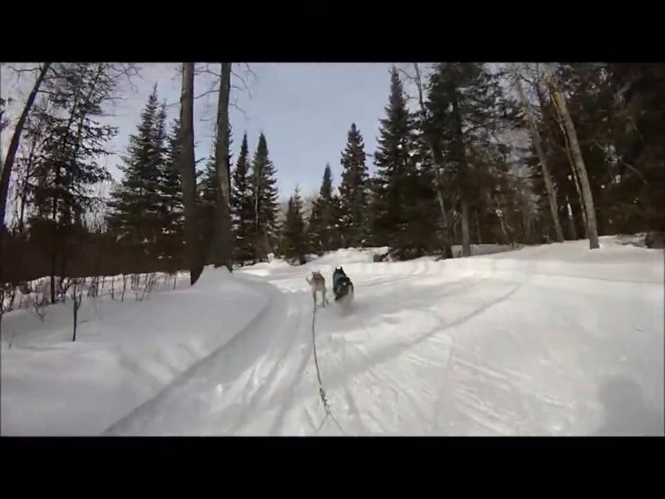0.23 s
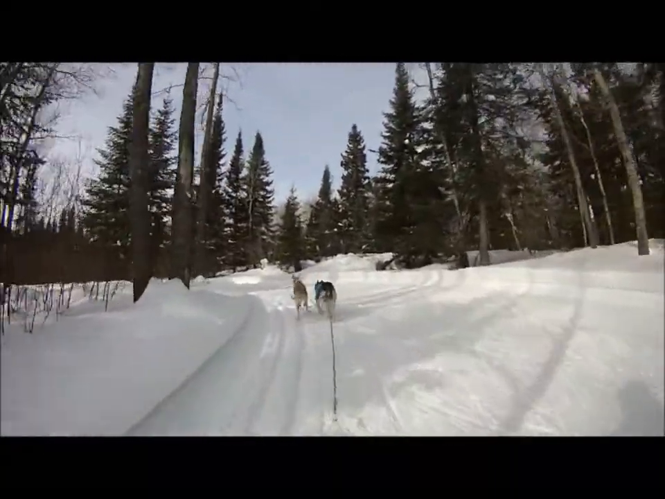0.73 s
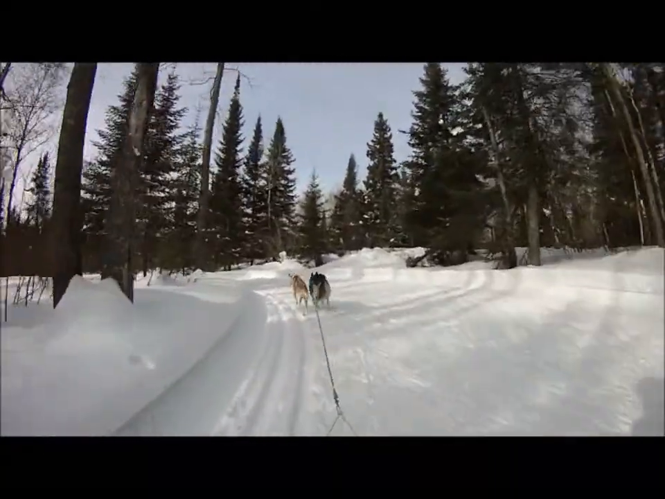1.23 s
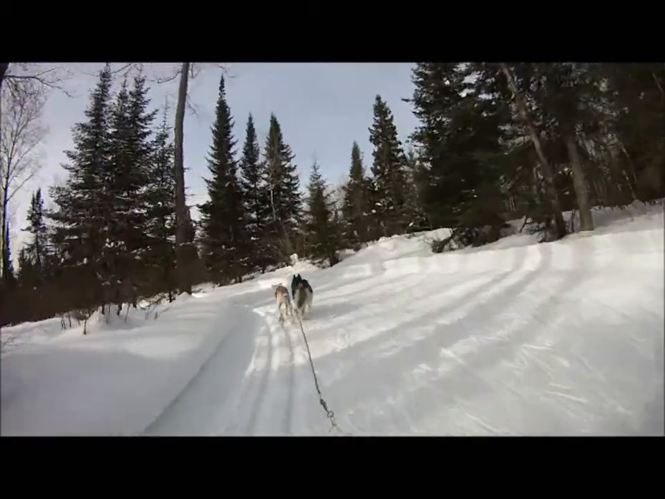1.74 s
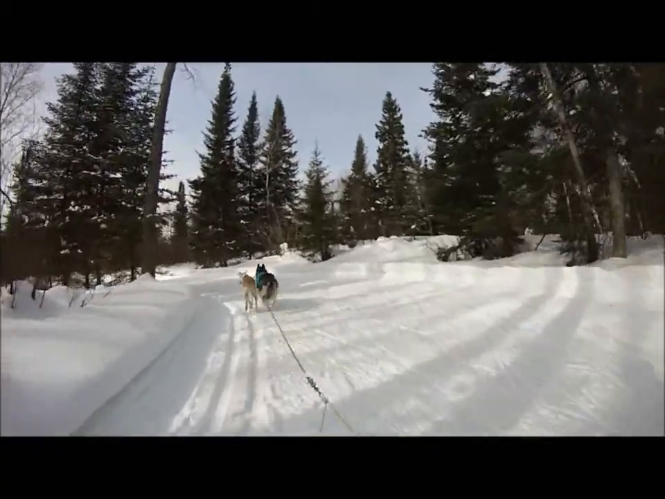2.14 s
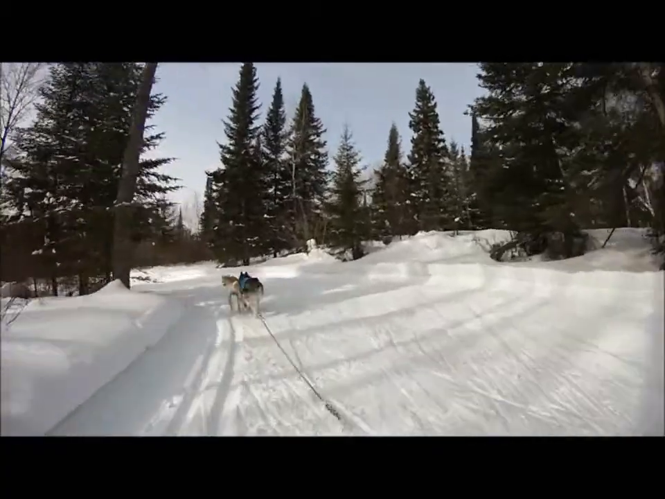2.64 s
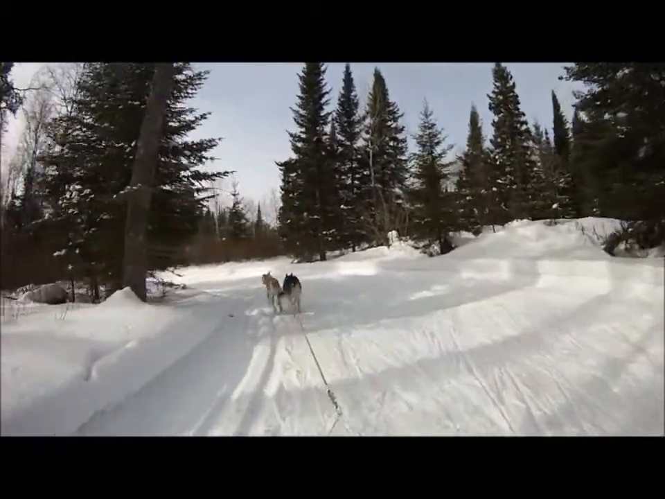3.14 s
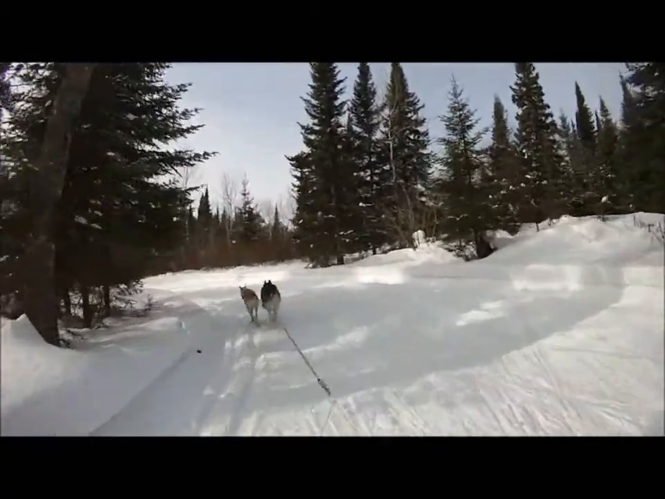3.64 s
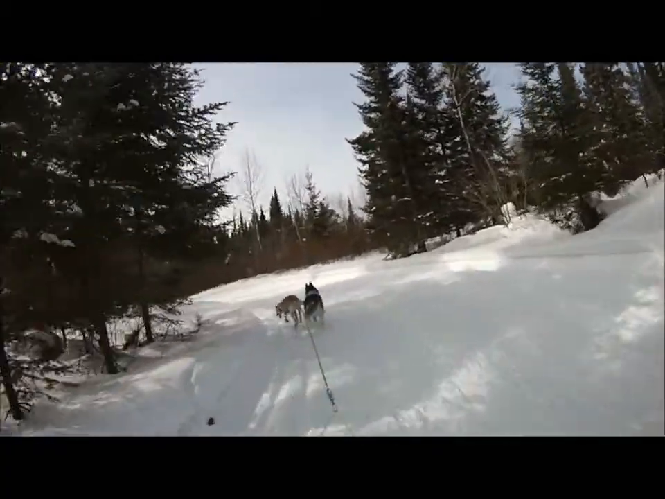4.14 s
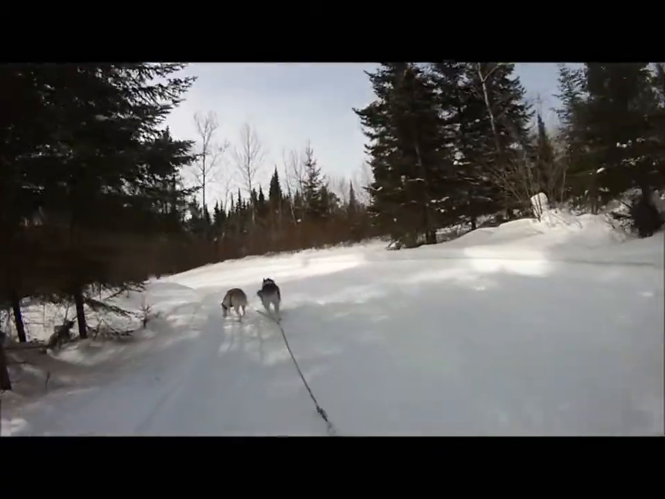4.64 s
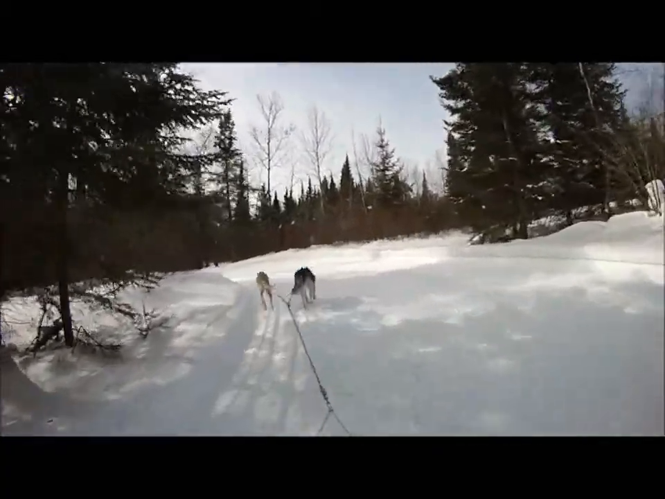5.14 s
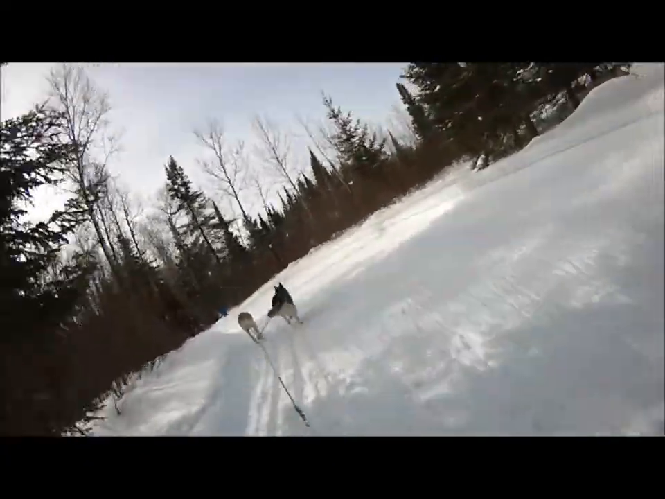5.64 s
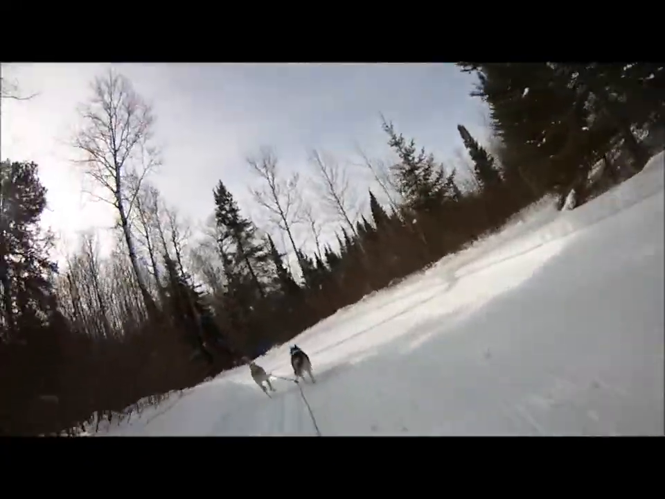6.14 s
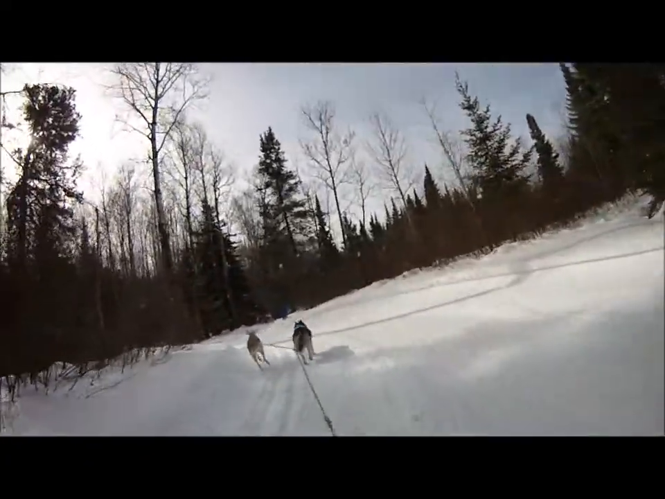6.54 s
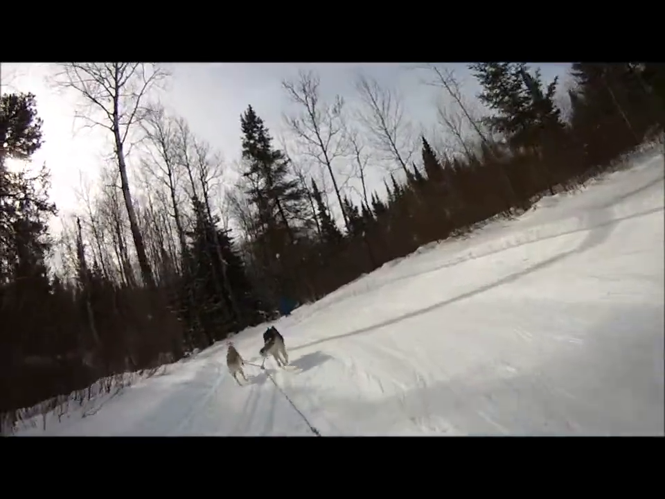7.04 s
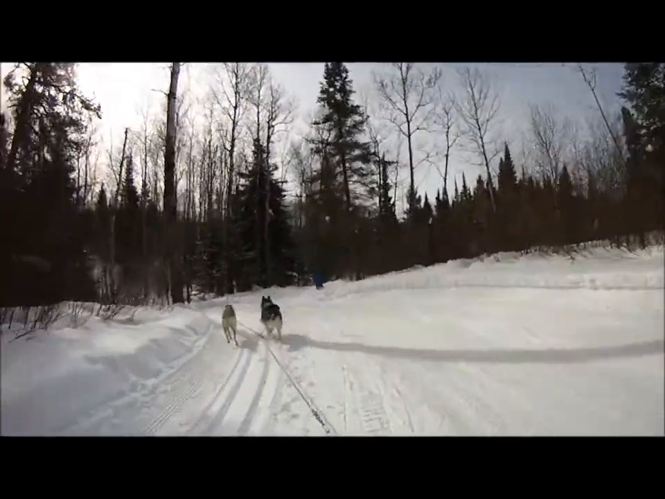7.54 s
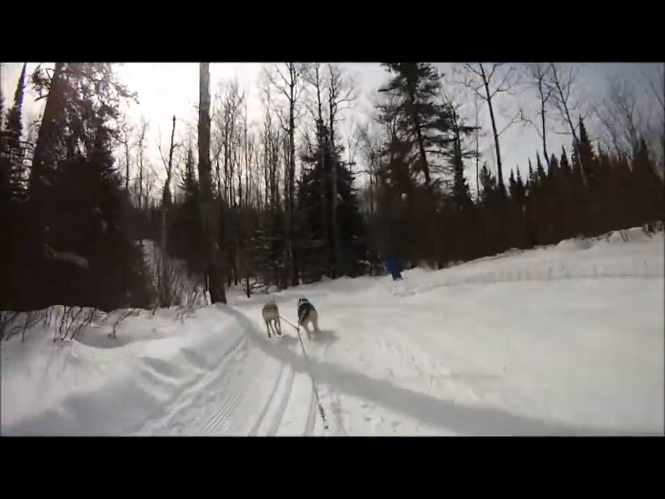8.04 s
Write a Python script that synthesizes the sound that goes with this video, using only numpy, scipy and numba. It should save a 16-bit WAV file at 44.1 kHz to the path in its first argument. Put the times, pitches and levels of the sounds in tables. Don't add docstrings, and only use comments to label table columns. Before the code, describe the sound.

A sled runs over packed snow, heard closely through a hollow plastic camera housing, dry and mono. From 0 to 1 s a thin grainy scrape carries sharp ticks, tiny creaks and quick ratcheting rattles. Wind swells around 1.3-1.8 s with low fluttering thumps. At 2-2.6 s the scrape roughens with clustered knocks, soft snow puffs and a ragged creak. Around 3 s come a scrape surge and loud plastic cracks, then a strong gust to 3.4 s. Rattles and many wind thumps crowd 4-4.4 s. The hardest knocks land at 4.8-5.2 s amid heavy scraping, followed by stepwise ratcheting until 5.8 s. A short strong creak comes at 6.05 s, then a quiet glide with faint ticks and a small bright squeak at 6.75 s. At 7.5-7.8 s scrape, clacks and buffeting return; a final tight cluster of knocks hits at 8.2 s.

```python
import sys
import numpy as np
from scipy import signal
from scipy.io import wavfile
from scipy.ndimage import uniform_filter1d
from numba import njit

SR = 44100
rng = np.random.default_rng(int(sys.argv[2]) if len(sys.argv) > 2 else 0)


def gain_from_db(level_db):
    decades = np.asarray(level_db, float) / 20
    return 10 ** decades


def persist_wave(psi):
    counts = np.round(np.clip(psi, -1, 1) * 32767).astype(np.int16)
    wavfile.write(sys.argv[1], SR, np.atleast_2d(counts).T)


N = 365126

# t/s, scrape level/dB
GLIDE = [(0.0, -39.5), (0.39, -45), (1.8, -36.5), (2.05, -31.5), (2.42, -35), (2.86, -27), (3.23, -40),
         (4.1, -35.5), (4.49, -39), (4.96, -29), (5.21, -35), (5.49, -40), (6.34, -47), (7.31, -40.5),
         (7.47, -27), (7.61, -31), (7.82, -39), (8.28, -33)]
SCRAPE_DB = (-2, -6.5, -8, -14)
# t/s, edge level against small parts/dB
LEAN = [(0, -6.5), (.6, -7), (1.1, -7.5), (1.7, -10), (2.4, -9.5), (3.1, -5), (3.7, -10), (4.2, -5.5),
        (4.8, -6.5), (5.4, -4.5), (5.7, -4), (6.1, -5.5), (6.8, 0.5), (7.6, -6.5), (8.1, -2)]

# f/Hz, width/Hz, level/dB
SHELL = [(2011, 49, 16), (2105, 128, 22), (2190, 78, 16), (2268, 54, 17)]
PARTS = [(3030, 133, 4.5), (3660, 170, -0.5), (4688, 335, 11), (5229, 250, 10), (5190, 270, -2.5),
         (6200, 310, -6.5)]
DOOR = [(680, 1570, -1), (1080, 355, 12.5), (1361, 370, -0.5), (1339, 30, 7), (1644, 48, 8)]
EDGE = [(6970, 416, 1), (8226, 292, 1), (9550, 460, -28), (9900, 380, -29)]
# f/Hz, width/Hz, level/dB
PARTS_LOADED = [(3070, 99, -3.5), (3743, 154, 1.5), (4604, 210, 13), (5130, 286, 8), (5420, 320, -0.5),
                (6300, 190, -9)]
EDGE_LOADED = [(7050, 190, 0.5), (8280, 250, 2), (6860, 280, -6.5)]

# snap level/dB, chatter level/dB, chatter rise/s, chatter fall/s
SLIP = [(18, -5, 0.00015, 0.0048), (16.7, -1, 0.00015, 0.0028), (19.9, -4, 0.00033, 0.0043),
        (20.1, -2.5, 0.00014, .0022)]
# t/s, length/s, slip rate/Hz, shell level/dB, small parts relative level/dB
GRINDS = [
    (0, 0.012, 317, -36, 6.5),
    (0.176, 0.018, 399, -25.5, -11),
    (0.978, .005, 390, -27.5, -10),
    (2.18, .1, 361.6, -33, -8),
    (2.9, 0.023, 270, -27.5, -8),
    (3.676, .017, 314, -27, -5),
    (6.0635, 0.031, 300, -21.5, -3.5),
    (6.6017, 0.013, 201, -38.5, -6),
    (6.6222, 0.012, 287, -29.5, -7.5),
    (7.2755, 0.01, 290.6, -24.5, -20),
]
SQUEAKS = [
    (0.2, 0.015, 330, -25, -9),
    (0.4686, 0.022, 240, -30.5, -6),
    (1.8093, 0.019, 250, -31, -4.5),
    (6.7453, 0.015, 410, -30, -0.5),
]
# t/s, shell level/dB, small parts relative level/dB
SNAPS = [(0.1212, -23.5, 6.5), (0.2548, -13.5, -1), (0.2624, -19, -2), (0.74, -25.5, 6), (.494, -32, 5),
         (.5035, -27.5, 3), (1.344, -27, -5), (2.817, -36, -16), (4.121, -31, -10), (1.931, -20.5, -10),
         (2.59, -28.5, -3), (0.809, -21.5, -5), (1.368, -22.5, -11), (1.4112, -32, -11), (1.8525, -26.5, 5),
         (4.0808, -19, -3), (0.8767, -22.5, -1.5), (1.417, -25, 0), (1.5861, -19.5, 1.5), (1.6938, -17, -2),
         (2.1639, -22, -4), (3.0029, -6.5, -4), (3.214, -7.5, -10.5), (3.2752, -19, -5.5), (3.651, -26, -4),
         (3.6725, -14.5, 4), (4.0583, -17, -3), (4.0767, -23, 5.5), (5.1563, -9.5, -5.5),
         (5.4992, -17.5, -3), (5.8116, -27, 0), (5.9293, -28.5, -7.5), (5.9815, -23.5, -4.5),
         (6.3776, -33.5, -6), (6.4807, -29.5, -6), (6.524, -45, -0.5), (6.655, -41, -1), (8.02, -37, -1),
         (4.744, -29, -9), (6.7881, -22.5, -1), (6.8989, -33, -10), (7.2861, -30.5, 5.5),
         (7.6361, -14.5, 1), (7.666, -18, 2), (7.7177, -26, -2), (7.8049, -14.5, 0), (8.2203, -9.5, -8),
         (8.2636, -21, -8)]
KNOCKS = [(0.232, -19, -9), (0.936, -28, -30), (1.517, -34, -40), (1.9024, -17, -35), (2.2271, -15, -14),
          (2.2565, -26, -10.5), (2.261, -17, -15), (2.2708, -20, -14), (2.2812, -17, -7),
          (2.5354, -13, -10), (2.4075, -17.5, -11), (2.6231, -21.5, -12.5), (2.9804, -17, -17),
          (3.0652, -44, -17), (3.1277, -31, -28), (4.7977, -8.5, -31), (4.857, -4.5, -9.5),
          (4.9445, -35.5, -17), (5.0106, -13, -14), (5.1845, -28, -27), (5.38, -21.5, -12),
          (5.3898, -14, -11), (5.8701, -33, -11), (5.9429, -34, -52), (6.169, -30, -32), (6.192, -39, -25),
          (6.203, -36, -9), (6.214, -33.5, -14), (6.8405, -34, -8), (7.0096, -30, -8.5), (7.0205, -25, -27),
          (7.5034, -14, -19), (7.7055, -21.5, -26), (7.746, -33, -9), (8.2044, -17, -16)]
CLACKS = [(1.352, -29, 3.5), (1.624, -32, 0), (1.8603, -30, 11), (1.8726, -27.5, -1), (1.9163, -27, -6),
          (2.111, -29, 1.5), (2.2447, -30, -3), (2.5123, -25.5, -15), (2.517, -27, -15),
          (2.8392, -17, -8.5), (3.1866, -22, -9), (3.3684, -27.5, -10), (3.3996, -23.5, -8.5),
          (3.582, -35, 5.5), (3.587, -38, -1), (3.5955, -30, -26), (3.8935, -43, -20), (4.0251, -27, -8),
          (4.0523, -30, 2), (4.0942, -34, -8), (4.126, -32, -23), (4.3028, -27, -7), (4.5653, -34, -23),
          (4.567, -27.5, -5), (4.7686, -45.5, 13), (5.8923, -32, -5), (5.9071, -29, -9), (7.053, -33, -21),
          (7.1486, -34, -20), (7.2226, -38.5, -17), (7.7881, -32, 8.5), (8.003, -37, 5), (8.2247, -18, -28),
          (8.2286, -25, -13.5), (8.2338, -20.5, -16), (8.2378, -18, -13), (8.2535, -33, 2)]
# t/s, number of steps, first gap/s, growth factor of each gap
RATCHETS = [(.2433, 2, .004, 1), (.2503, 4, .0081, .95), (.7475, 4, .0063, .9), (.7692, 11, .0037, .99),
            (.819, 2, .019, 1), (.985, 5, .0045, .9), (1.1776, 3, .0034, 1), (1.3749, 3, .0044, .95),
            (1.3869, 2, .0035, 1), (1.3943, 4, .0036, 1), (1.642, 2, .0102, 1), (1.7882, 6, .0035, 1),
            (1.8278, 7, .0031, 1), (2.2916, 4, .0065, .85), (2.5414, 4, .0064, 1), (3.0064, 8, .0033, 1.01),
            (3.0343, 4, .005, 1), (3.221, 2, .01, 1), (3.2433, 3, .0068, 1.25), (3.6946, 5, .0031, 1.2),
            (4.0647, 2, .004, 1), (4.3227, 2, .0108, 1), (4.3477, 5, .009, .95), (5.3947, 8, .0037, 1.035),
            (5.4287, 3, .0079, 1.31), (5.5364, 3, .014, 1.36), (5.6008, 1, .02, 1), (5.6508, 4, .015, .88),
            (5.7014, 3, .013, 1.035), (6.0469, 5, .0032, 1), (6.761, 5, .0036, 1.08)]
# shell level/dB, level change per step/dB, small parts relative level/dB
RATCHET_FORCE = [(-20.5, 3, -7), (-14, -1.2, -2.5), (-29.5, -1, 7.5), (-27.5, -0.02, 3), (-19.5, -5, 1.5),
                 (-23.5, 0.2, -3), (-28, -1.6, 3.5), (-21, -1.2, -6), (-17, 1, -7), (-19, -1, -8),
                 (-15, -4, -3.5), (-17, -2.5, 0), (-28, 1, 2.5), (-14, -6.5, -2), (-20.5, 0.8, -4.5),
                 (-20.5, -1, -3.5), (-24.5, 1.3, -10), (-19, -2, -6.5), (-18.5, 1, -9), (-24.5, 0.75, -0.5),
                 (-16, 0.5, -7), (-9, -1.5, -5.5), (-17, -1.1, -4.5), (-10.5, -1.7, -8), (-19.5, -0.4, -1),
                 (-11, -0.8, -1), (-11, -.1, -1.5), (-13, -1.5, 0.5), (-13, -0.9, -4), (-14, 0.1, -6),
                 (-21.5, 0, -5)]

# peak t/s, peak level/dB, rise/s, fall/s
GUSTS = [(0.22, -35, 0.3, 0.14), (1.3, -40.5, 1, 0.33), (1.62, -27.5, 0.46, 0.4), (1.93, -39, 0.042, 0.2),
         (2.42, -31, 0.46, 0.31), (2.98, -26.5, 0.49, 0.16), (3.35, -25, 0.22, 0.083),
         (3.69, -34.5, 0.1, 0.14), (3.93, -29.5, 0.12, 0.26), (4.18, -30, 1, 3.7), (4.66, -29, 0.27, 0.23),
         (5.14, -33.5, 0.9, 0.18), (4.99, -40, .1, 0.084), (5.5, -32, 0.13, 0.67), (5.9, -37, 0.18, 0.22),
         (6.08, -31, 0.09, 0.033), (6.42, -50, .2, .1), (.5, -45, 0.39, 0.09), (6.75, -43, 0.15, 0.1),
         (7.61, -34, 0.92, 2.2), (7.819, -25, 0.12, 0.041), (8.0, -35.5, 0.43, 2.3), (8.27, -36.5, 1, 0.33)]
# f/Hz, width/Hz, level/dB
WIND = [(246, 84.3, 2), (340, 219, 0), (498, 397, -9.5)]
FLUTTER = [(750, 720, 0)]
BUFFET = [(64, 80, -2.5), (154, 133, 4)]
# t/s, level/dB, f/Hz
THUMPS = [(0.963, -26, 326), (1.178, -20.5, 294), (1.351, -21, 340), (1.42, -18.5, 288), (1.55, -18, 314),
          (1.581, -16, 460), (1.671, -13.5, 553), (1.706, -17.5, 332), (1.827, -20, 365), (2.444, -20, 302),
          (2.467, -20, 340), (2.939, -21, 247), (3.224, -14, 340), (3.36, -25, 340), (3.938, -16, 340),
          (3.959, -18.5, 434), (4.315, -20, 292), (4.342, -16, 500), (4.462, -29, 328), (4.634, -28, 340),
          (4.914, -26, 299), (5.07, -16.5, 275), (5.104, -18.5, 298), (5.144, -10.5, 340),
          (5.185, -16.5, 308), (5.359, -19, 320), (7.543, -17.5, 338), (7.629, -13, 292), (7.817, -23, 306),
          (8.004, -21.5, 408), (1.518, -26, 284), (1.617, -20, 296), (1.634, -20, 450), (1.72, -20, 249),
          (1.758, -26, 248), (2.373, -20.5, 270), (2.4, -28, 170), (3.515, -28, 264), (3.978, -30, 255),
          (4.059, -22.5, 222), (4.073, -23, 300), (4.126, -18, 420), (4.137, -17, 357), (4.155, -15.5, 676),
          (4.184, -17.5, 430), (4.197, -23, 230), (4.208, -22, 450), (4.224, -23, 300), (4.278, -18.5, 387),
          (4.293, -21, 200), (4.33, -13.5, 396), (7.531, -17.5, 298), (7.574, -21, 340), (7.588, -25, 200),
          (7.618, -15.5, 250), (7.658, -18, 200), (7.731, -30, 250), (7.779, -20.5, 400),
          (7.935, -27.5, 189), (8.225, -14.5, 433)]
# t/s, level/dB, f/Hz
SCUFFS = [(1.072, -30, 272), (1.207, -30.5, 269), (1.471, -22, 277), (2.187, -21.5, 434),
          (2.2915, -14, 930), (1.905, -28, 272), (1.916, -31, 252), (1.929, -25, 306), (3.429, -29.5, 378),
          (4.662, -23.5, 1490), (3.914, -20, 301), (4.536, -40, 266), (4.567, -16, 950), (4.686, -24, 243),
          (5.033, -22, 243), (5.823, -28, 1170), (5.862, -28, 1160), (5.9, -26.5, 910), (6.097, -27, 280),
          (6.127, -33, 320), (6.21, -29, 1010), (6.262, -38, 603), (6.417, -35.5, 262), (6.978, -30.5, 700),
          (7.042, -26, 327), (7.32, -28.5, 830), (7.473, -24, 256), (7.661, -28, 1200), (7.93, -27, 388),
          (8.128, -21.5, 305), (8.24, -18, 990), (1.176, -19, 1250), (1.185, -26, 1450), (4.431, -41, 250),
          (4.486, -38, 300), (4.769, -36, 200), (6.867, -31.5, 258)]
# start t/s, end t/s, level change/dB
SHELTERS = [
    (1.863, 2.27, -8),
    (2.7, 2.82, -1.5),
    (5.695, 6.55, -7.5),
]


def low(x, hz, order):
    return signal.sosfilt(signal.butter(order, hz, fs=SR, output="sos"), x)


def curves(table):
    s, *columns = np.transpose(table)
    return [np.interp(np.arange(N) / SR, s, c) for c in columns]


def walk(rate):
    k = int(SR / rate)
    held = np.repeat(rng.standard_normal(N // k + 1), k)
    return 1.3 * uniform_filter1d(uniform_filter1d(held, k), k)[:N]


def spikes(s, size):
    return np.bincount(np.clip((np.asarray(s) * SR).astype(int), 0, N - 1), size, N)


def fade(x, tau_s):
    return signal.lfilter([1], [1, -np.exp(-1 / (tau_s * SR))], x)


def grains(spread_db):
    x = rng.standard_normal(N) * gain_from_db(spread_db * rng.exponential(size=N))
    return x / x.std()


def ring(x, modes, sign=-1, patchy_db=0):
    def grip():
        return gain_from_db(patchy_db * walk(25)) if patchy_db else 1

    def resonate(v, hz, width):
        return signal.lfilter(*signal.iirpeak(hz, hz / width, SR), v)

    sound, response = 0, 0
    impulse = signal.unit_impulse(SR // 4)
    for k, (hz, width, db) in enumerate(modes):
        gain = sign ** k * gain_from_db(db)
        sound = sound + gain * resonate(x * grip(), hz, width)
        response = response + gain * resonate(impulse, hz, width)
    return sound / np.linalg.norm(response)


def runners(part_db):
    rough_db = 0.5 * walk(20) + 1.6 * walk(90)
    crunch = low(grains(spread_db=2.0), hz=10400, order=1)
    return [crunch * gain_from_db(db + rough_db + 1.35 * walk(30)) for db in part_db]


def mount():
    rows = np.vstack(creaks() + single_slips() + ratchets())
    s, loose, shell_db, small_db, door_db = rows.T
    parts_db = shell_db + small_db
    part_db = [shell_db, parts_db, shell_db + door_db, parts_db]
    t = np.arange(SR // 40) / SR
    chatter, rattle = rng.standard_normal(len(t)), rng.standard_normal(N)
    drives = []
    for db, (snap_db, chatter_db, rise_s, fall_s) in zip(part_db, SLIP):
        push, slack = spikes(s, gain_from_db(db)), spikes(s, gain_from_db(db) * loose)
        joint = signal.fftconvolve(push, chatter * (np.exp(-t / fall_s) - np.exp(-t / rise_s)))[:N]
        shake = (fade(slack, fall_s) - fade(slack, rise_s)) * rattle
        drives.append(gain_from_db(snap_db) * push + gain_from_db(chatter_db) * (joint + shake))
    return drives


def creaks():
    rows = []
    for runs, (door_db, spread, scatter_db, loose) in ((GRINDS, (-2.5, 0.59, 2, 1.3)), (SQUEAKS, (-6, 0, 2, 1.5))):
        for s, length, rate, db, small_db in runs:
            gap, *chance = rng.standard_normal((4, 40))
            at = np.cumsum(np.exp(spread * gap)) / rate
            at = at - at[0]
            colour = [db, small_db, door_db] + scatter_db * np.transpose(chance)
            run = np.column_stack([s + at, np.full(len(at), loose), colour])
            rows.append(run[at < length])
    return rows


def single_slips():
    rows = []
    for kind, loose, door_db in ((SNAPS, 0.94, -4.5), (KNOCKS, 1.67, -8.5), (CLACKS, 1.1, 3.5)):
        rows.append(np.column_stack([np.insert(kind, 1, loose, axis=1), np.full(len(kind), door_db)]))
    return rows


def ratchet_times(s, steps, gap, growth):
    return s + np.cumsum(gap * growth ** (np.arange(steps) - 1.)) - gap / growth


def ratchets():
    door_db, scatter_db, loose = -5.5, 2.24, 0.75
    rows = []
    for run, (db, step_db, small_db) in zip(RATCHETS, RATCHET_FORCE):
        at = ratchet_times(*run)
        colour = [db, small_db, door_db] + scatter_db * rng.standard_normal((len(at), 3))
        colour[:, 0] += step_db * np.arange(len(at))
        rows.append(np.column_stack([at, np.full(len(at), loose), colour]))
    return rows


def ratchet_hush():
    ends = [ratchet_times(*run)[-1] for run in RATCHETS if run[2] > 0.006]
    return -4 * fade(spikes(ends, np.ones(len(ends))), tau_s=0.077)


def housing(hush_db):
    load_db, = curves(GLIDE)
    lean_db, = curves(LEAN)
    patchy_db = 1.45
    scrapes = runners([load_db + hush_db + db for db in SCRAPE_DB])
    ticks = mount()
    ticks[3] = gain_from_db(lean_db) * ticks[3]
    door, edge = scrapes[2] + ticks[2], scrapes[3] + ticks[3]

    rub = sum(ring(scrapes[0] * gain_from_db(db - 27.5 + 2 * walk(14)), [(hz, width, 0)]) for hz, width, db in SHELL)
    body = ring(ticks[0], SHELL, sign=0.99) + rub + ring(door, DOOR, patchy_db=patchy_db)
    out = low(body, hz=3560, order=2)
    out += ring(ticks[1], PARTS) - ring(ticks[3], EDGE)
    out += ring(scrapes[1], PARTS_LOADED, patchy_db=patchy_db) - ring(scrapes[3], EDGE_LOADED)
    out -= ring(edge * gain_from_db(-23.5 + 0.65 * (lean_db + 10)), [(12300, 7600, 0)])
    valley_hz, width_hz, depth = 2770, 410, 0.37
    return out - depth * signal.lfilter(*signal.iirpeak(valley_hz, valley_hz / width_hz, SR), out)


def gusts():
    t = np.arange(N) / SR
    calm_db = -55.5
    swells = [np.interp(t, [s - rise, s, s + fall], [calm_db, db, calm_db]) for s, db, rise, fall in GUSTS]
    return np.max(swells, axis=0)


def wind(db):
    db = db + 1.2 * walk(15) + 2.2 * walk(50)
    swirl = grains(spread_db=2.5)
    strong_db = db + 0.073 * (db + 16.0)
    deep_db = strong_db + 0.053 * (db + 25.5) - 2.0 + shelter()
    turbulence = ring(swirl * gain_from_db(db), WIND)
    turbulence += ring(swirl * gain_from_db(strong_db - 8.0), FLUTTER)
    turbulence += ring(swirl * gain_from_db(deep_db), BUFFET)
    return low(turbulence, hz=1200, order=2) + eddies()


def eddies():
    t = np.arange(-600, 600) / SR
    out = np.zeros(N)
    for (at, db, hz), turn in zip(THUMPS, rng.random(len(THUMPS))):
        i = int(at * SR) - len(t) // 2
        burst = np.exp(-(t * hz / 0.45) ** 2) * np.cos(2 * np.pi * (hz * t + turn))
        out[i:i + len(t)] += gain_from_db(db + 6) * burst
    return out - low(out, hz=90, order=1)


def scuffs():
    decay_s, q = 0.0052, 2.3
    t = np.arange(SR // 20) / SR
    out = np.zeros(N + len(t))
    for (s, db, hz), noise in zip(SCUFFS, rng.standard_normal((len(SCUFFS), len(t)))):
        push = low(noise, hz=2 * hz, order=2) * t / decay_s * np.exp(-t / decay_s)
        puff = ring(push, [(hz, hz / q, 0)])
        i = int(s * SR)
        out[i:i + len(t)] += gain_from_db(db + 2.5) * puff / np.abs(puff).max()
    return out[:N]


def shelter():
    t = np.arange(N) / SR
    edge_s = 0.036
    return sum(np.interp(t, [a - edge_s, a, b, b + edge_s], [0, db, db, 0]) for a, b, db in SHELTERS)


def scene():
    hush_db = ratchet_hush()
    mix = housing(hush_db) + wind(gusts() + hush_db) + scuffs()
    return np.tile(mix, (2, 1))


@njit
def follow(x, attack, release):
    e, out = 0., np.empty(len(x))
    for i in range(len(x)):
        e += (abs(x[i]) - e) * (attack if abs(x[i]) > e else release)
        out[i] = e
    return out


def roll_off(x):
    return signal.sosfilt(signal.butter(12, 16470, fs=SR, output="sos"), x)


def record(dry):
    envelope = follow(dry[0], 1 / (0.026 * SR), 1 / (0.08 * SR))
    gain = (1 + envelope / gain_from_db(-26.5)) ** -0.3
    wide = low(np.clip(dry * gain, -0.9, 0.9), hz=13900, order=8)
    mix = np.clip(wide - low(wide, hz=40, order=1), -1, 1)
    return roll_off(mix)


dry = scene()
out = record(dry)
persist_wave(out)
```